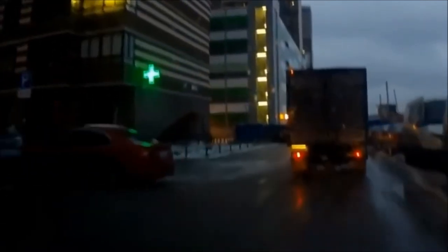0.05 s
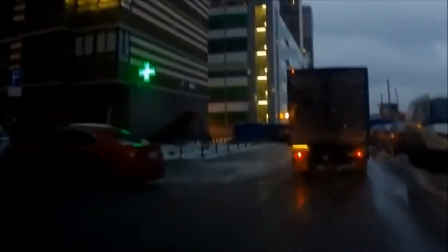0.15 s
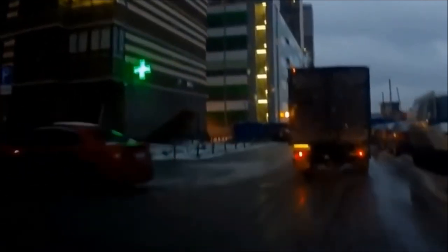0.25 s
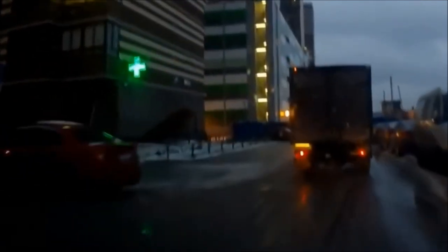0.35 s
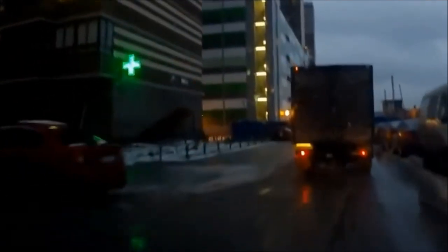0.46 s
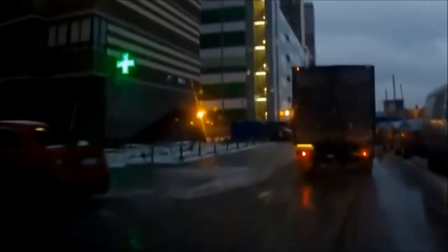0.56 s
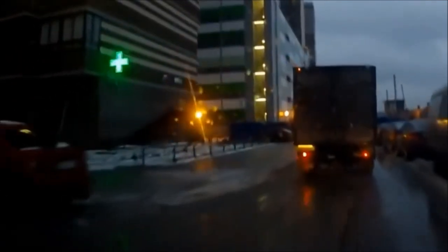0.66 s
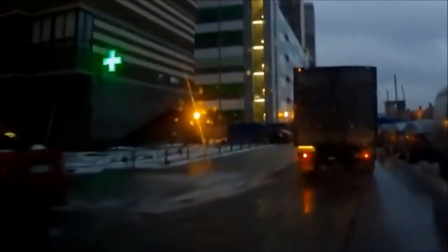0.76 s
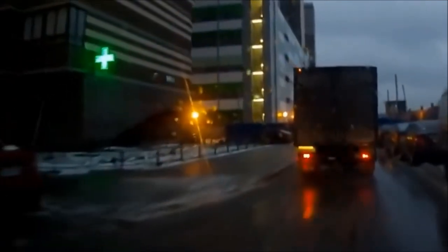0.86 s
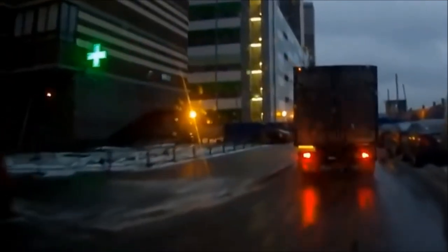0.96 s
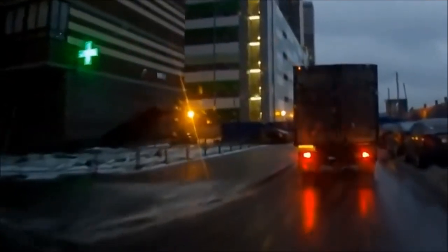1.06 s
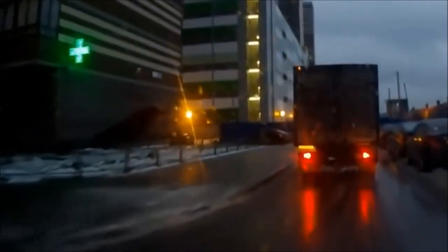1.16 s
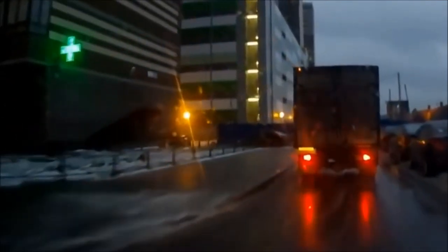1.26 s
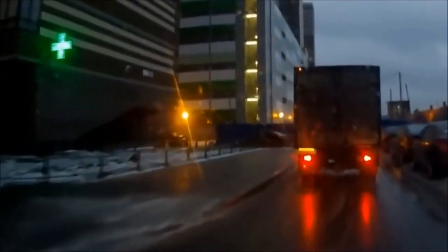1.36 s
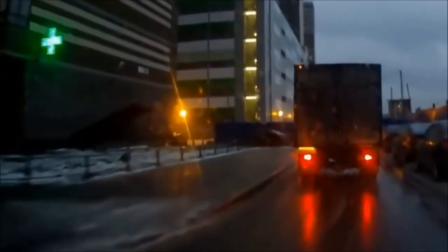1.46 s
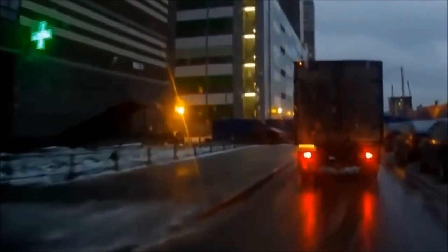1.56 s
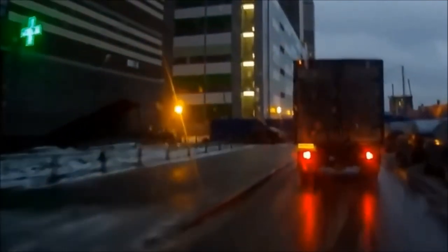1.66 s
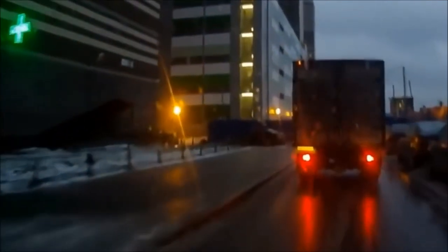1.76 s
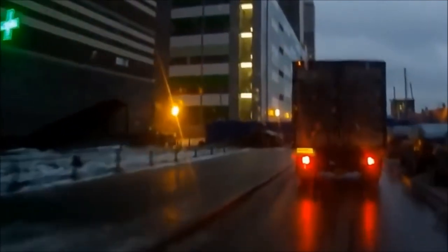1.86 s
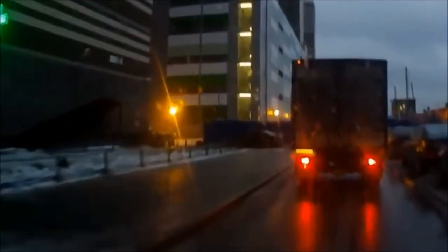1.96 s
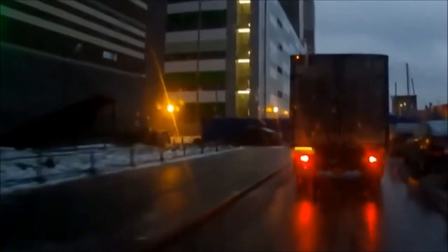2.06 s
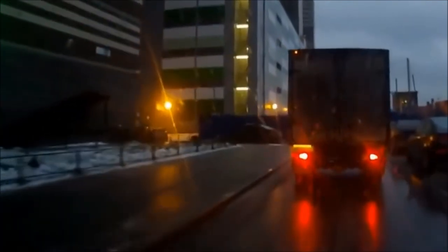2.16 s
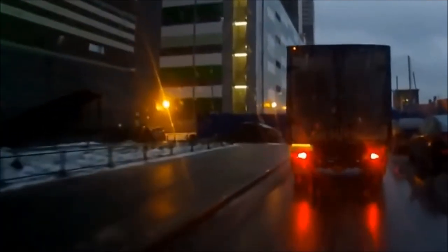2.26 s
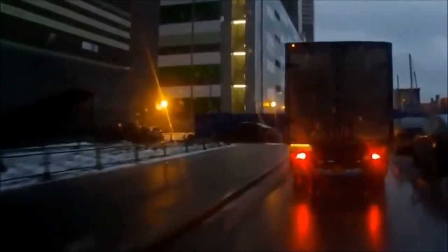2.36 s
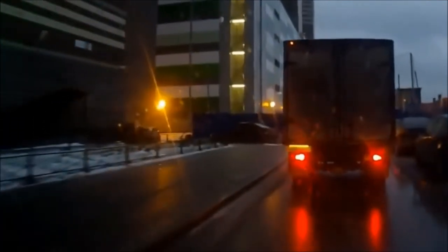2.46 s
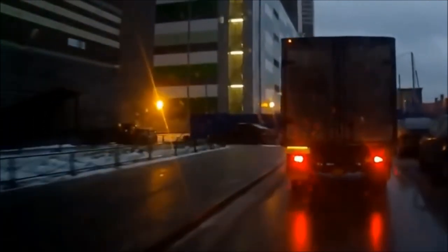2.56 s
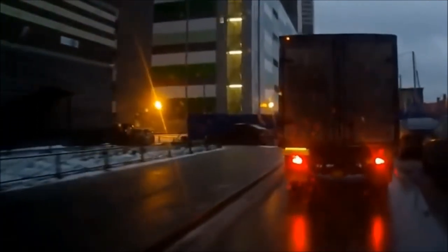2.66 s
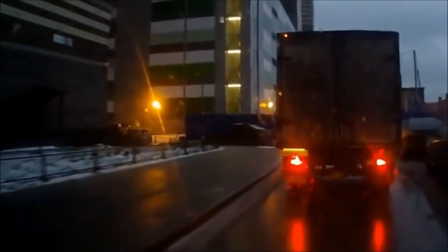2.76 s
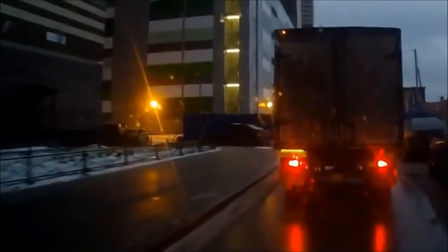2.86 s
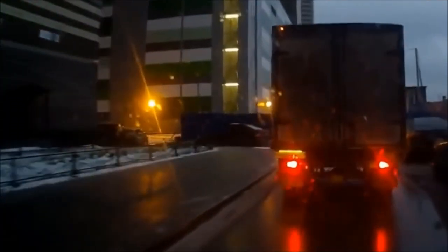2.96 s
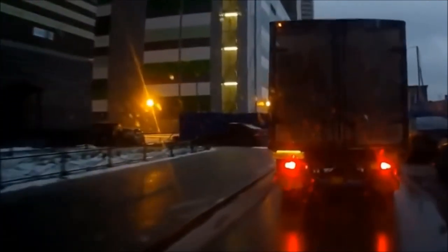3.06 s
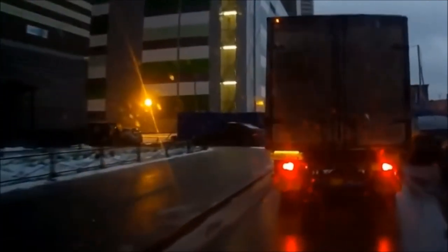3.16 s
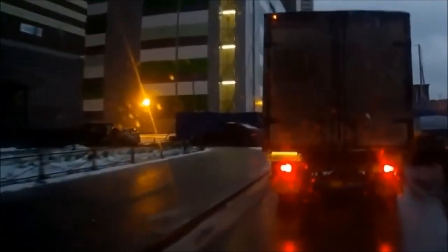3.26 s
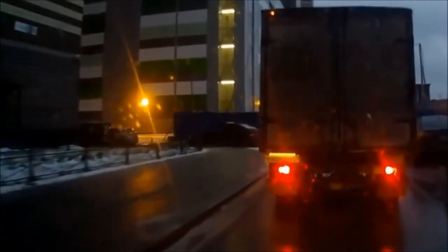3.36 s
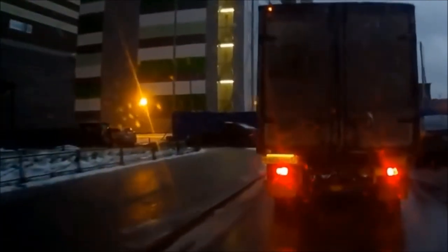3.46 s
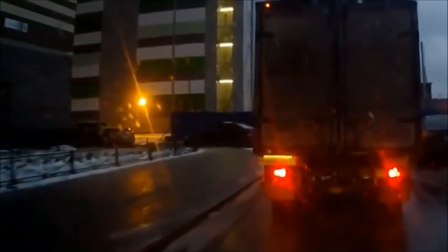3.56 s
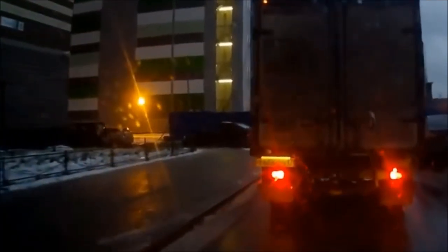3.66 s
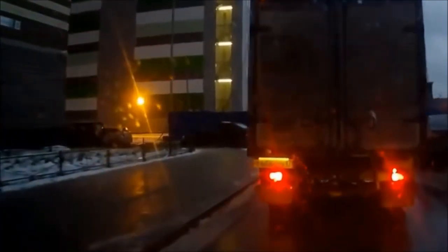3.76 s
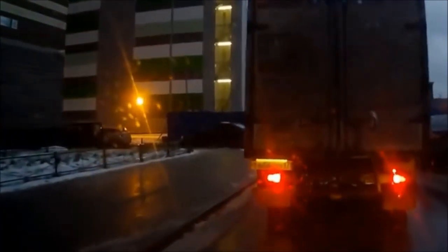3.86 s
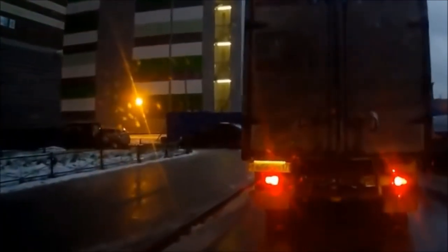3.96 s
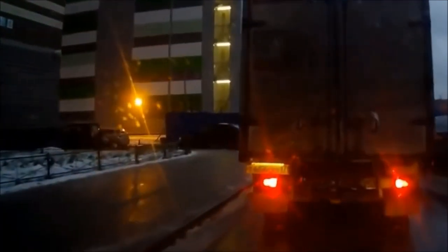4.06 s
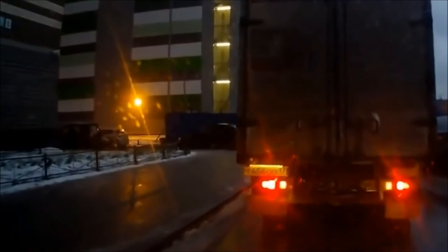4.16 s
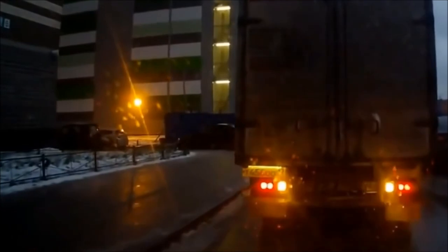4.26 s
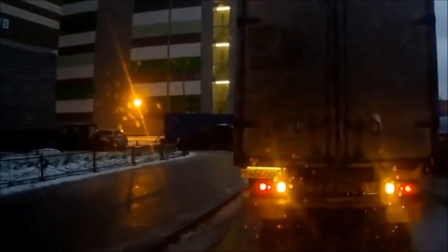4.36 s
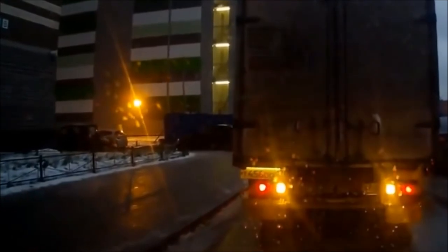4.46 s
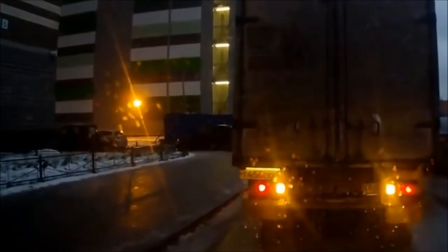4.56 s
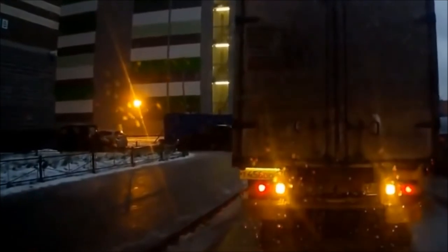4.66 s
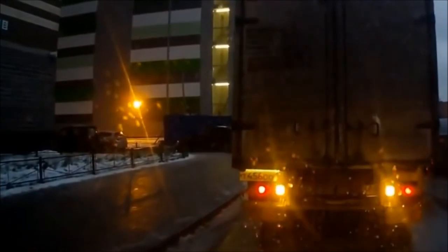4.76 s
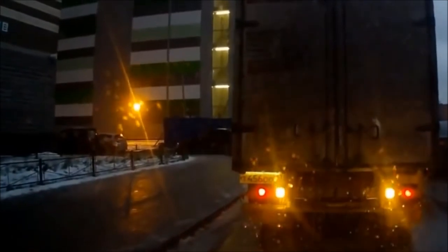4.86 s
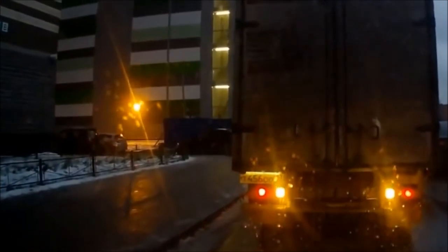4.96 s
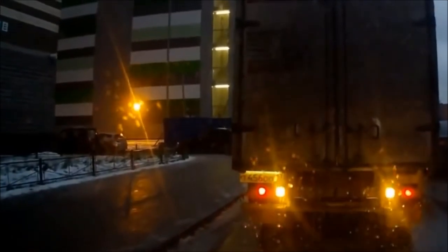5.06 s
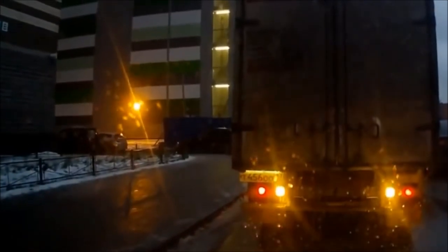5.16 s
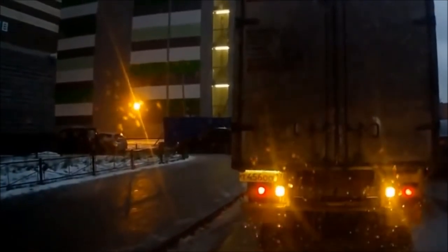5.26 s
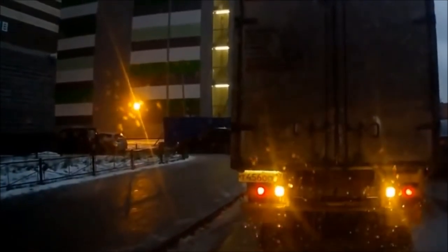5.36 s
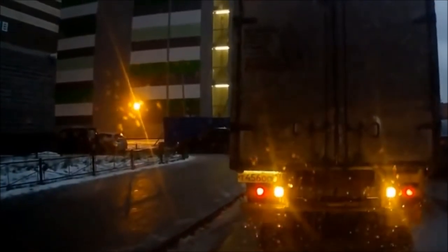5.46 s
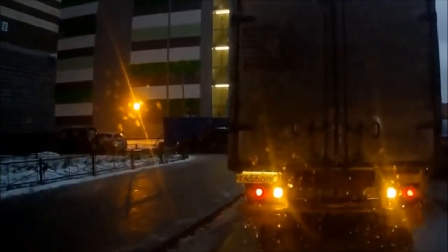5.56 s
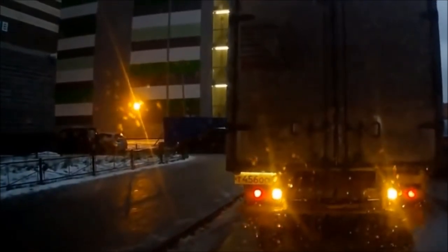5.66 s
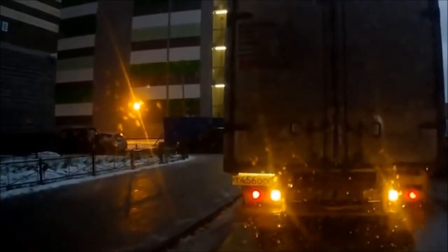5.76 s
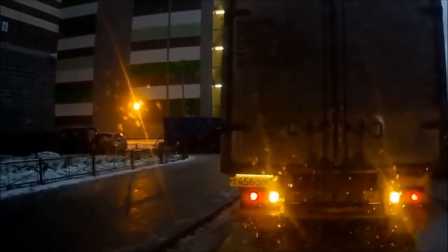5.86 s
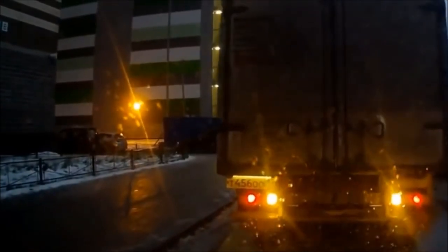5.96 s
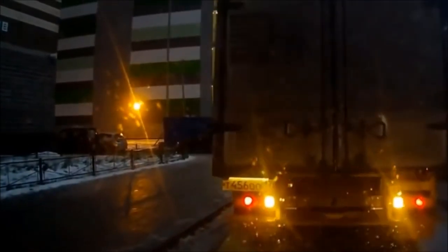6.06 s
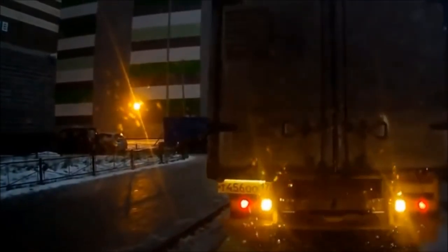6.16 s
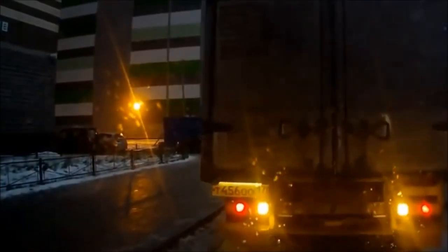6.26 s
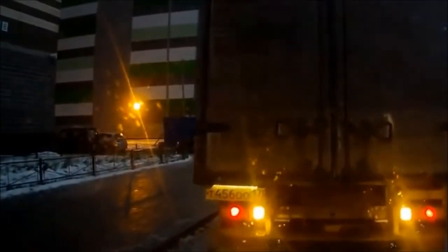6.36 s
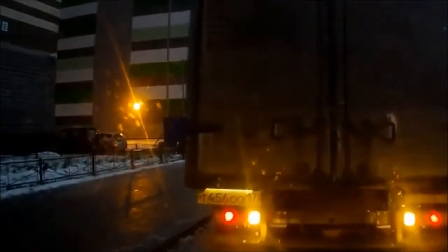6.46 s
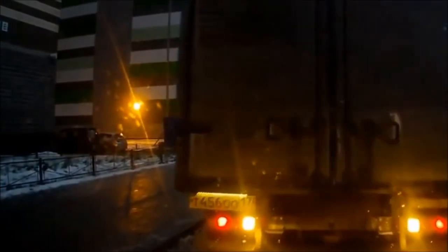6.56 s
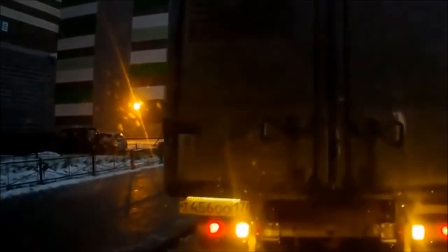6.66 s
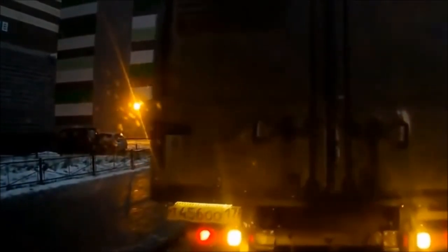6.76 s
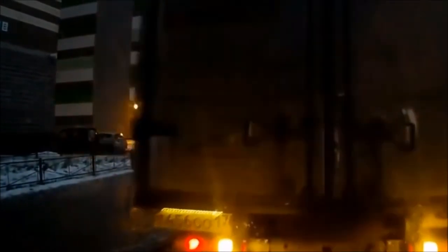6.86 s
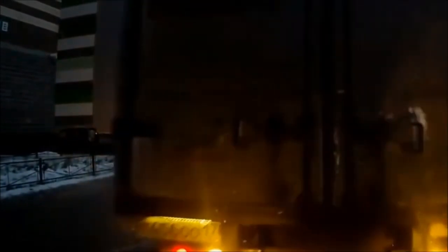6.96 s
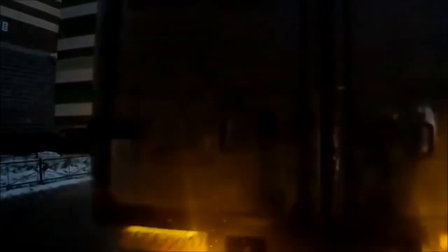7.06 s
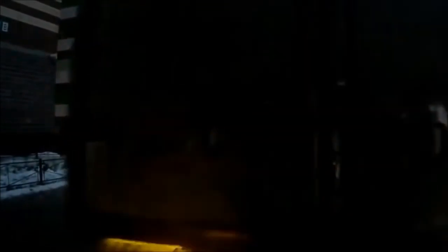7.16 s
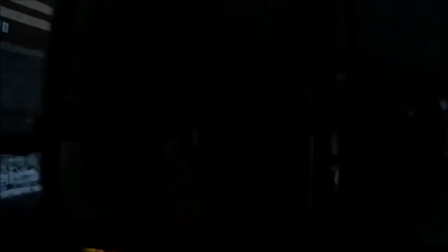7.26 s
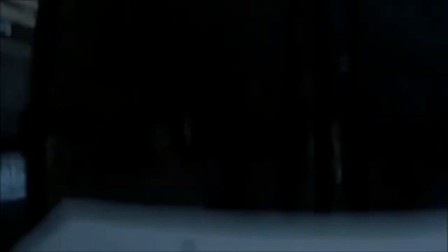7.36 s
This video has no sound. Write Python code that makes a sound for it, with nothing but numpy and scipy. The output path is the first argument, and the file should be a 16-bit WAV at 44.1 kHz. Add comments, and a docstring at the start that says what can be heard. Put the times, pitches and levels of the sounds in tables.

```python
"""Inside a car that slows on a wet street, thumps over dips and stops with its engine idling.
A truck backs towards it; something hard clacks in the cabin, then the truck's tail crushes the bonnet.
Tyres, spray and fan are coloured noise, engines are sums of firing orders, and struck parts are
decaying modes. A small microphone on the windscreen hears mostly rumble, and the crash overloads it."""
import sys
import numpy as np
from scipy import signal
from scipy.fft import rfft, irfft, next_fast_len
from scipy.io import wavfile
from scipy.ndimage import uniform_filter1d

SR = 44100
rng = np.random.default_rng(int(sys.argv[2]) if len(sys.argv) > 2 else 0)


def waveform_to_disk(signal):
    """Save audio, clipped to [-1, 1], as 16-bit WAV at the path in sys.argv[1]."""
    frames = np.transpose(np.atleast_2d(signal))
    scaled = np.clip(frames, -1, 1) * 32767
    samples = np.round(scaled).astype(np.int16)
    wavfile.write(sys.argv[1], SR, samples)


N = 326163
T = np.arange(N) / SR

# How far levels waver at random. Each entry: name of the sound, spread in dB.
WAVER_DB = {"tread": .7, "crumple": 2.5, "engine": 2.2, "rustle": 2}
# The truck backs up in short pushes. Each row: middle in seconds, half length in seconds,
# wet tyre hiss in dB, exhaust hum in dB, growl in dB.
PUSHES = [(4.95, .2, -70, -63, -72), (5.75, 0.58, -66, -41.5, -65), (6.87, 0.39, -60.5, -52.5, -60)]
# The truck strikes and shoves the car in jerks. Each row: time in seconds, blow in relative dB.
JERKS = [(7.2412, -4.5), (7.2535, -3.5), (7.2685, 1.5), (7.3005, 0.5), (7.3232, 3), (7.3412, 7),
         (7.3735, 4)]
IMPACT_S = JERKS[0][0]


def undb(db):
    """Level to amplitude: 20 dB is a factor of ten."""
    return 10 ** (np.asarray(db) / 20)


def swell(middle, half, x=T):
    """Gaussian hump of height 1, down to 1/e at half on either side."""
    return np.exp(-((x - middle) / half) ** 2)


def decay(age, t60):
    """Exponential damping: the level falls by 60 dB in t60 seconds."""
    return np.exp(-np.log(1000) * age / t60)


def fade(start, t60, rise_s=0.00048):
    """Impact envelope: an exponential rise meets exponential damping."""
    age = np.maximum(T - start, 0)
    return (1 - np.exp(-age / rise_s)) * decay(age, t60)


def walk(rate):
    """Slow random fluctuation: levels held 1 / rate seconds, then smoothed, with spread 1."""
    hold = max(int(SR / rate), 2)
    steps = np.repeat(rng.standard_normal(N // hold + 1), hold)
    x = uniform_filter1d(steps, hold)[:N]
    return x / x.std()


def noise(colour):
    """Spectral shaping: white noise filtered to a colour of (Hz, relative dB per Hz); rms 1."""
    hz, db = np.transpose(colour)
    size = next_fast_len(N)
    f = np.maximum(np.fft.rfftfreq(size, 1 / SR), 1)
    gain = undb(np.interp(np.log(f), np.log(hz), db, left=-120, right=-120))
    x = irfft(rfft(rng.standard_normal(size)) * gain, size)[:N]
    return x / x.std()


def band(hz, width_hz):
    """Resonance: white noise passed twice through one peak, each pass width_hz wide; rms 1."""
    peak = signal.iirpeak(hz, hz / width_hz, fs=SR)
    once = signal.lfilter(*peak, rng.standard_normal(N))
    x = signal.lfilter(*peak, once)
    return x / x.std()


def ring(blows, modes, contact_s):
    """Modal impact: blows (s, dB) excite modes (Hz, dB, t60 s); a longer contact sounds softer."""
    t = T[:SR]
    response = sum(undb(db) * np.sin(2 * np.pi * hz * t) * decay(t, t60) for hz, db, t60 in modes)
    force = np.zeros(N)
    for s, db in blows:
        force[min(int(s * SR), N - 1)] += undb(db)
    push = np.hanning(int(contact_s * SR) + 3)
    softened = np.convolve(response, push / push.sum())
    return signal.fftconvolve(force, softened)[:N]


def whine(hz=8550, db=-84, waver=0.00077):
    """Frequency modulation: a thin electronic whistle wavers in pitch."""
    pitch = hz * (1 + waver * walk(18))
    return undb(db) * np.sin(2 * np.pi * np.cumsum(pitch) / SR)


def fan(db=-56, blade_hz=816, blade_db=-74):
    """Broadband flow noise of the heater, with a faint blade-passing tone."""
    # The colour of the blown air. Each row: frequency in Hz, relative dB per Hz.
    air_colour = [(105, 4), (160, 8.5), (210, 0.5), (270, 3.5), (320, 1), (390, 7), (480, -5), (570, -12.5),
                  (670, -3.5), (870, -10), (1050, -19), (1400, -29), (2500, -33.5), (2800, -28),
                  (3200, -23), (6000, -26.5)]
    blade = np.sin(2 * np.pi * blade_hz * T + .5 * walk(9.2))
    return noise(air_colour) * undb(db + 1.2 * walk(9.1)) + undb(blade_db) * blade


def speed(brake_s=1.83, stop_s=4.726, bite=1.6):
    """Growing deceleration: speed as a share of cruising, braked ever harder to a halt."""
    braking = np.clip((T - brake_s) / (stop_s - brake_s), 0, 1)
    return np.maximum(1 - braking ** bite, 1e-6)


def tyres(part):
    """Power law of tyre noise: the gain of one part falls with speed and drifts along the road."""
    # Each entry: part, then dB at cruising speed, dB lost per halving of speed, dB at a standstill.
    parts = {"rumble": (-25.5, 5, -30), "boom": (-32.5, 7.6, -44.5), "roar": (-47.5, 3.5, -53),
             "wet": (-55, 14.9, -70)}
    # Passing changes in road noise, up or down. Each row: middle in seconds, half length in seconds,
    # then the change in dB of rumble, boom, roar and wet.
    road_changes = [(0.246, 0.37, 4, 0.5, -1.5, -0.5), (.55, 0.3, -0.5, 3.5, 1.5, 0),
                    (1.1, 0.5, 1, 2.5, 0.5, 0.5), (1.977, 0.11, 4, 4, 6.5, -1),
                    (2.247, 0.08, 0, -3, 0.5, .5), (2.7, .2, -0.5, 2, -0.5, 2),
                    (3.173, 0.21, -1.5, 5.5, 1, 1)]
    cruise_db, halving_db, rest_db = parts[part]
    column = list(parts).index(part)
    change_db = sum(dbs[column] * swell(s, half) for s, half, *dbs in road_changes)
    rolling = undb(cruise_db + halving_db * np.log2(speed()) + change_db)
    return np.hypot(rolling, undb(rest_db))


def road():
    """Structure-borne rumble, cabin boom, tread roar and the uneven hiss of spray from both vehicles."""
    # Body shake, cabin boom, tread and spray. Each row: frequency in Hz, relative dB per Hz.
    rumble_colour = [(8, 3.5), (16, -5.5), (22, -1), (28, -3.5), (35, 7), (42, -2), (50, -6), (58, -14.5),
                     (70, -27.5), (100, -40.5)]
    boom_colour = [(50, -28), (66, 2.5), (85, 0.5), (105, -6.5), (135, -13), (170, -21), (220, -31),
                   (330, -56)]
    roar_colour = [(100, -9.5), (150, 10), (200, 2), (240, 6), (310, -3.5), (400, -1.5), (500, -4),
                   (600, -9), (850, -16), (1100, -20), (1500, -33), (2500, -38)]
    wet_colour = [(450, 1), (800, 8), (1000, 2.5), (1250, 3), (1580, 1.5), (1900, 0), (2400, 1),
                  (2780, 3.5), (3100, -1.5), (3750, -0.5), (4500, -6), (5500, -17.5), (7000, -26),
                  (12000, -37)]
    body = noise(rumble_colour) * tyres("rumble") + noise(boom_colour) * tyres("boom")
    tread = noise(roar_colour) * tyres("roar") * undb(WAVER_DB["tread"] * walk(25))
    truck_tyres = sum(undb(db) * swell(s, half) for s, half, db, *_ in PUSHES)
    flicker = undb(0.57 * walk(14) + 1.0 * walk(400))
    # independent hisses add as powers
    spray = noise(wet_colour) * np.hypot(tyres("wet"), truck_tyres) * flicker
    return body + tread + spray


def grit(t60=0.055):
    """Local resonance: each flicked stone or drop rings its own spot of the underbody."""
    # Each row: start in seconds, level in dB, centre in Hz, filter width in Hz.
    ticks = [(1.027, -54, 3490, 2200), (2.094, -46, 4070, 2400), (2.746, -59, 3896, 2600),
             (3.797, -61, 3250, 1500), (5.225, -59.5, 3950, 1000), (5.527, -59.5, 2780, 300.7),
             (5.6718, -62, 3500, 1500)]
    return sum(undb(db) * fade(s, t60) * band(hz, width) for s, db, hz, width in ticks)


def knocks(t60=0.25):
    """Damped impacts: dull, soft knocks of coloured noise from the suspension."""
    # Each row: start in seconds, level in dB.
    blows = [(1.935, -52), (1.975, -42), (3.478, -56), (4.785, -53)]
    colour = [(150, -4.5), (350, 3.0), (750, 5.5), (1200, -6), (1800, -14.5), (4000, -24)]
    return noise(colour) * sum(undb(db) * fade(s, t60, rise_s=0.0015) for s, db in blows)


def dips():
    """Modal excitation: dips in the road set the car bouncing and drumming on its suspension."""
    # Each row: time in seconds, blow in relative dB.
    blows = [(.06, -17.5), (1.5, -13.5), (1.685, -10), (1.865, -7.5), (1.955, -4.5), (2.06, -17.5)]
    # Each row: mode in Hz, relative level in dB, t60 in seconds.
    bounce_modes = [(20, -1.5, 0.74), (35.2, -29.5, 0.26), (58.15, -5.5, 0.44)]
    return ring(blows, bounce_modes, contact_s=0.014)


def drone(firing_hz, wobble):
    """Harmonic synthesis: orders of an engine's firing rate, each lurching a little; rms 1."""
    # Each row: multiple of the firing rate, relative level in dB.
    orders = [(1, -14), (2, 3), (3, -29), (4, -20), (5, -20), (6, -26.5)]
    phase = 2 * np.pi * np.cumsum(firing_hz * (1 + wobble * walk(24))) / SR
    x = 0
    for k, db in orders:
        level = undb(db + WAVER_DB["engine"] * walk(14))
        x = x + level * np.sin(k * phase + 0.86 * walk(5))
    return x / x.std()


def car_engine(idle_hz=26.7, idle_db=-33, rev_db_per_hz=0.2835):
    """Cabin resonance: loudness follows the revs and peaks as the second order meets the cabin's drumming."""
    # Each row: time in seconds, firing rate in Hz.
    revs = [(0, 39.76), (.6, 38.84), (.95, 40.94), (1.2, 42.47), (1.42, 40.5), (1.58, 32.18), (2, 32.16),
            (2.4, 28.3), (2.9, 27)]
    firing = np.interp(T, *np.transpose(revs))
    drum_db = 6 * swell(65.7, 2, 2 * firing)  # peak at 65.7 Hz
    level_db = idle_db + rev_db_per_hz * (firing - idle_hz) + drum_db
    wobble = .03 + .008 * speed()  # the moving car rocks its engine
    return drone(firing, wobble) * undb(level_db)


def truck_engine(firing_hz=23.92, db=-38, throb_db=-31, near_s=3.0, exhaust_hz=105, growl_hz=430):
    """Tone plus resonant noise: a slow idle throb nears, then hums and growls at each push."""
    throb = np.sin(2 * np.pi * firing_hz * T + walk(3.8)) * undb(throb_db + 2 * walk(5.7))
    idle = (drone(firing_hz, .03) * undb(db) + throb) * np.minimum(T / near_s, 1)
    hum = np.sin(2 * np.pi * np.cumsum(exhaust_hz * (1 + 0.0175 * walk(6.8))) / SR)
    growl = band(growl_hz, 200)
    pushes = 0
    for s, half, _, hum_db, growl_db in PUSHES:
        pushes = pushes + (undb(hum_db) * hum + undb(growl_db) * growl) * swell(s, half)
    return idle + pushes


def rustle():
    """Friction noise: something loose scuffs in soft, grainy swells."""
    # Each row: middle in seconds, half length in seconds, level in dB.
    slides = [(6.664, .04, -58.5), (6.844, 0.0092, -53.5), (6.88, 0.039, -58), (7.2, 0.066, -59)]
    colour = [(700, -1), (2000, -10.5), (3000, -3), (4000, -1.0), (5500, -11), (8000, -24), (14000, -33)]
    level = sum(undb(db) * swell(s, half) for s, half, db in slides)
    return noise(colour) * undb(WAVER_DB["rustle"] * walk(600)) * level


def note(start, hz, t60=0.019, sag_per_s=5.7):
    """Damped chirp: a small struck part's note dies quickly and sinks as the part seats."""
    age = np.clip(T - start, 0, t60)
    pitch = hz * np.exp(-sag_per_s * age) * (T >= start)
    return np.sin(2 * np.pi * np.cumsum(pitch) / SR) * fade(start, t60)


def clacks(ring_db=-6):
    """Coupled impacts: plastic knocks rattle and ring, each with its own note and a dull console thump."""
    # Each row: start in seconds, level in dB, t60 of the rattle in seconds, thump in dB,
    # note in Hz, note level in dB.
    hits = [(6.6727, -38, 0.06, -33, 2850, -53), (6.6777, -26.5, 0.039, -60, 4050, -36),
            (6.681, -26, 0.023, -19, 4310, -14), (6.687, -29, 0.055, -56, 2710, -30),
            (6.694, -35.5, 0.055, -45, 1880, -23), (6.702, -41, 0.047, -57, 2600, -38),
            (6.72, -44, 0.19, -22.5, 3960, -46), (6.7572, -42, 0.04, -25, 4230, -36),
            (6.768, -55, 0.058, -42, 4150, -44), (6.7746, -57, .03, -50, 2650, -49)]
    # Each row: frequency in Hz, relative dB per Hz.
    rattle_colour = [(100, 0), (300, 1.5), (580, 5), (850, -3), (980, -11), (1240, -1), (1470, -10),
                     (1790, -6), (2200, -8), (2650, -5), (3100, -5), (4200, 0), (5200, -12), (8000, -27.5),
                     (14000, -33)]
    # Hard plastic, then the console. Each row: mode in Hz, relative level in dB, t60 in seconds.
    plastic_modes = [(540, -10, 0.06), (840, -9, 0.044), (1286, -5, 0.047), (1660, -12, .06),
                     (1800, -11, 0.07), (2420, -12, .06), (2700, -8, 0.07), (3257, -17, .06),
                     (3900, -11, 0.08), (4255, -1, 0.045), (4533, -11, .05)]
    console_modes = [(49.1, -6.5, 0.6), (67.7, 4, 0.4), (114, -6, 0.25), (184.2, -17, 0.052)]
    envelope = sum(undb(db) * fade(s, t60, rise_s=0.00069) for s, db, t60, *_ in hits)
    rattle = noise(rattle_colour) * envelope
    tone = ring([(s, db + ring_db) for s, db, *_ in hits], plastic_modes, contact_s=.0001)
    notes = sum(undb(db) * note(s, hz) for s, *_, hz, db in hits)
    thumps = ring([(s, thump) for s, _, _, thump, *_ in hits], console_modes, contact_s=0.0013)
    return rattle + tone + notes + thumps


def cabin(x):
    """Cavity resonance: the hollow between dashboard and glass lifts a few narrow bands."""
    # Each row: centre in Hz, width in Hz, boost in dB.
    hollows = [(1574, 59, 4), (2766, 55, 3.5), (3480, 14, 5.5), (3810, 60, 3)]
    for hz, width, db in hollows:
        x = x + (undb(db) - 1) * signal.lfilter(*signal.iirpeak(hz, hz / width, fs=SR), x)
    return x


def grains(modes, per_s, spread_db=2, detune=.07):
    """Granular fracture: countless snaps after impact each ring one slightly detuned mode; rms 1."""
    start, t = int(IMPACT_S * SR), T[:SR // 10]
    out = np.zeros(N + len(t))
    count = int(per_s * (N - start) / SR)
    for when, which, size, tune in rng.random((count, 4)):
        hz, db, t60 = modes[int(which * len(modes))]
        i = start + int(when * (N - start))
        tone = np.sin(2 * np.pi * hz * (1 + detune * (2 * tune - 1)) * t)
        level = undb(db - spread_db * np.log(1 - size))  # few snaps are large
        out[i:i + len(t)] += level * tone * decay(t, t60)
    return out[:N] / out[start:N].std()


def heave(db=1, yield_db=-2, settle_hz=14):
    """Plastic yielding: each jerk excites the body shell, whose swing levels off as the metal gives."""
    # Each row: mode in Hz, relative level in dB, t60 in seconds.
    shell_modes = [(35.23, 4.5, 0.14), (64, -12.5, 0.39), (81, -6, 0.19), (119.3, -10, 0.21),
                   (162, -10, 0.17), (204, -13.5, 0.14), (257, -17.5, 0.12), (476, -19, 0.1),
                   (563, -16, 0.11), (670, -21, 0.18), (854, -19, 0.097)]
    swing = ring(JERKS, shell_modes, contact_s=.0021) * undb(db)
    # a high-pass removes the constant offset and the slowest swing
    swing = signal.lfilter(*signal.butter(2, settle_hz, "high", fs=SR), swing)
    return undb(yield_db) * np.tanh(swing / undb(yield_db))


def crash(build_s=0.038, release=1.16, splinter_db=-27.5, buckle_db=-27, crumple_db=-17):
    """Fracture and load release: plastic cracks and the bonnet crunches as the heave briefly lets go."""
    # Bumper, grille and lamps break. Each row: middle in seconds, half length in seconds,
    # splinters in dB, metal crunch in dB, ring in Hz, ring level in dB.
    fractures = [(7.2455, 0.0011, -52, -30, 3000, -43), (7.2656, 0.00084, -22, -29, 3250, -31),
                 (7.2708, 0.00047, -35, -30, 3730, -33), (7.2764, 0.0028, -25.5, -12, 4400, -31),
                 (7.2821, 0.00088, -29, -15, 3760, -32), (7.2883, 0.00084, -27, -27, 4060, -34),
                 (7.2906, 0.0007, -16, -25, 4140, -14), (7.302, 0.00088, -42, -23, 4130, -46),
                 (7.3147, 0.0028, -45, -22, 2880, -32), (7.343, .0012, -27, -17, 3280, -24),
                 (7.3477, 0.001, -23, -17, 3500, -25), (7.3664, 0.00079, -18, -15, 3100, -23),
                 (7.3696, 0.00036, -11, -22, 6930, -27), (7.3715, 0.00069, -16, -12, 3500, -17),
                 (7.3882, 0.0011, -28, -13, 2880, -27)]
    # Breaking plastic, then buckling metal. Each row: mode in Hz, relative level in dB, t60 in seconds.
    bumper_modes = [(2150, -4, 0.027), (2857, 3, 0.0088), (3300, -5, .016), (3620, -1, 0.014),
                    (4080, -3, 0.011), (4580, -10, .01), (6900, -5, 0.0059), (10200, -6.5, 0.0089)]
    bonnet_modes = [(483, 9, 0.069), (514, -2, 0.11), (558, 5, 0.081), (705, -4, 0.036), (850, 0.5, 0.051),
                    (932, 3.5, 0.045), (1273, -1, 0.036), (1440, -10, 0.046)]
    # Cracking, then crumpling. Each row: frequency in Hz, relative dB per Hz.
    crack_colour = [(200, 8), (500, 8), (900, 9.5), (1250, 1), (2000, -2), (3700, -4), (5000, -19),
                    (6400, -13), (7100, -17), (10500, -24), (15000, -25)]
    crumple_colour = [(40, 14), (80, 13), (120, 9), (230, 7.5), (330, -16), (500, -8), (850, -15),
                      (1100, -22), (1400, -22), (4000, -20), (6000, -39), (12000, -45)]
    shell = heave()
    shards = grains(bumper_modes, per_s=3000) * undb(-5.5) + noise(crack_colour) * undb(1.5)
    buckles = grains(bonnet_modes, per_s=300)
    cracks = 0
    for s, half, shard_db, crunch_db, hz, ring_db in fractures:
        burst = undb(shard_db) * shards + undb(crunch_db) * buckles + undb(ring_db) * band(hz, 900)
        cracks = cracks + burst * swell(s, half)
        shell = shell * (1 - swell(s, half * release))
    # thinning debris and lasting metal noise lie under the fractures
    debris = shards * undb(splinter_db) * fade(IMPACT_S, t60=0.5, rise_s=.015)
    crumple = noise(crumple_colour) * undb(crumple_db + WAVER_DB["crumple"] * walk(500))
    metal = buckles * undb(buckle_db) + crumple
    build = np.clip((T - IMPACT_S) / build_s, 0, 1)
    return shell + cracks + build * (debris + metal)


def scene():
    """Two paths: airborne sound crosses the cabin; jolts reach the microphone through its mount."""
    engines = car_engine() + truck_engine()
    air = cabin(fan() + road() + grit() + knocks() + engines + rustle() + clacks())
    mono = whine() + air + dips() + crash()
    return np.array([mono, mono])


def record(dry, ceiling=0.29, knee=6, leak=0.082, hiss_db=-81, side_noise_db=-66, top_hz=15500):
    """Saturation: big swings choke most finer sound; faint noise and a steep treble cut-off follow."""
    # Shared hiss, then each channel's noise. Each row: frequency in Hz, relative dB per Hz.
    hiss_colour = [(1000, -29.5), (5000, 0.5), (7000, 10), (12500, 10), (13500, -5.5), (15000, -12)]
    channel_colour = [(30, 25), (110, 21), (220, 28), (750, 30), (1100, -4), (4000, 2.5), (7000, 10),
                      (12000, -1), (15000, -27)]
    # saturate at twice the sample rate to limit aliasing; a small leak passes unlimited
    fine = signal.resample_poly(dry, 2, 1, axis=1)
    limited = fine / (1 + np.abs(fine / ceiling) ** knee) ** (1 / knee)
    fine = (1 - leak) * limited + leak * fine
    x = signal.resample_poly(fine, 1, 2, axis=1) + undb(hiss_db) * noise(hiss_colour)
    # a very small level offset, and a faint independent noise in each channel
    x = x * undb([[.07], [-.07]])
    x = x + undb(side_noise_db) * np.array([noise(channel_colour), noise(channel_colour)])
    return signal.sosfilt(signal.ellip(8, .2, 70, top_hz, fs=SR, output="sos"), x)


dry = scene()
out = record(dry)
waveform_to_disk(out)
```